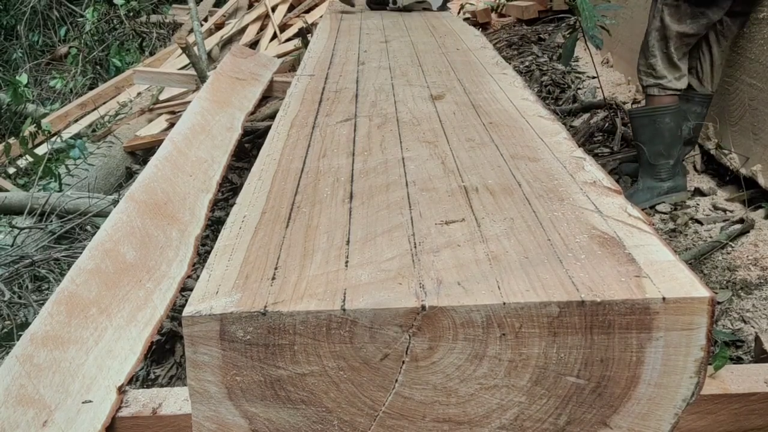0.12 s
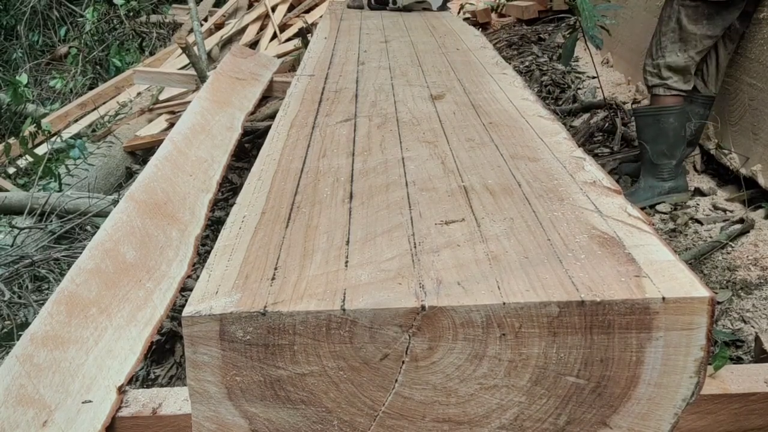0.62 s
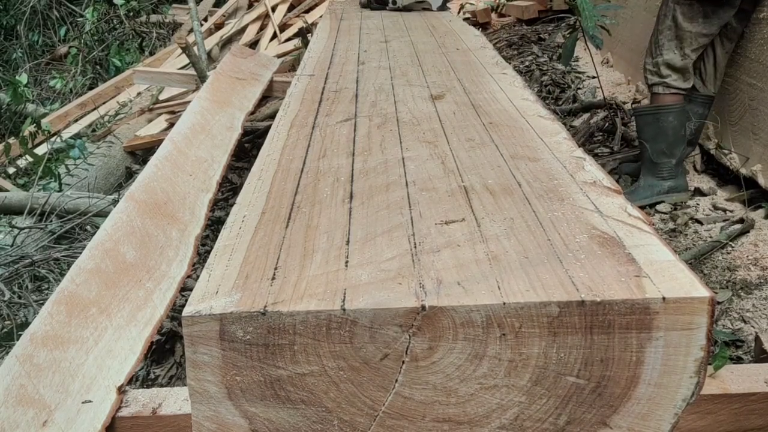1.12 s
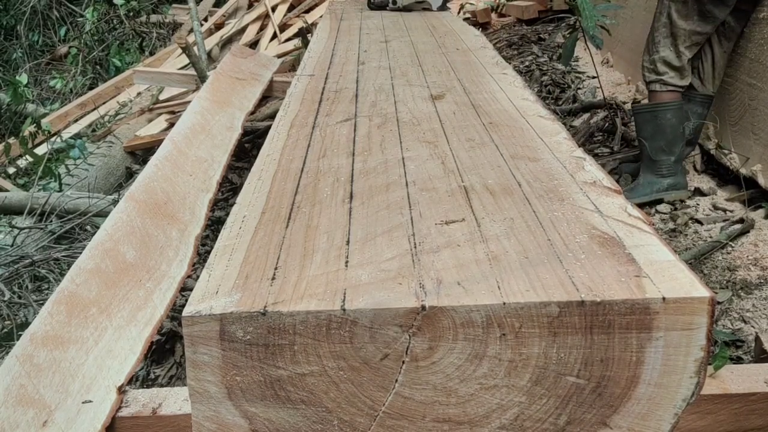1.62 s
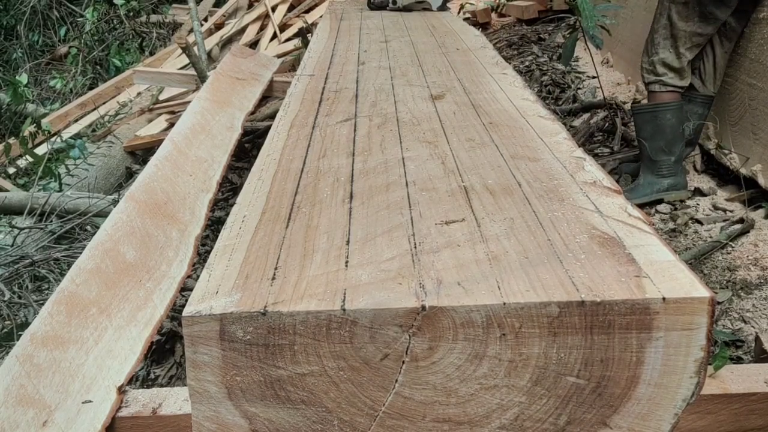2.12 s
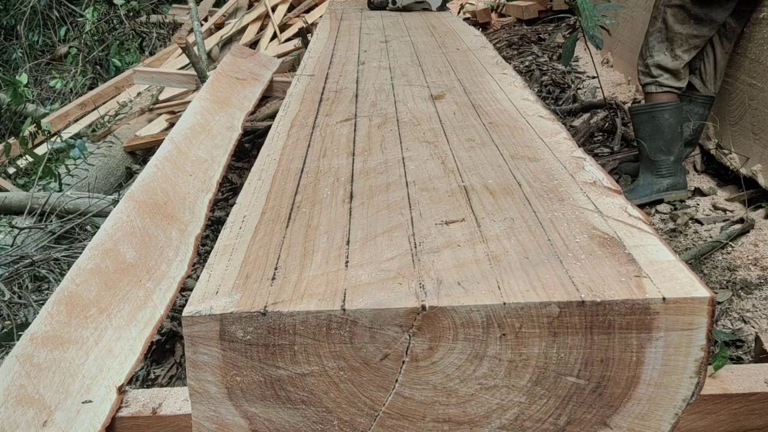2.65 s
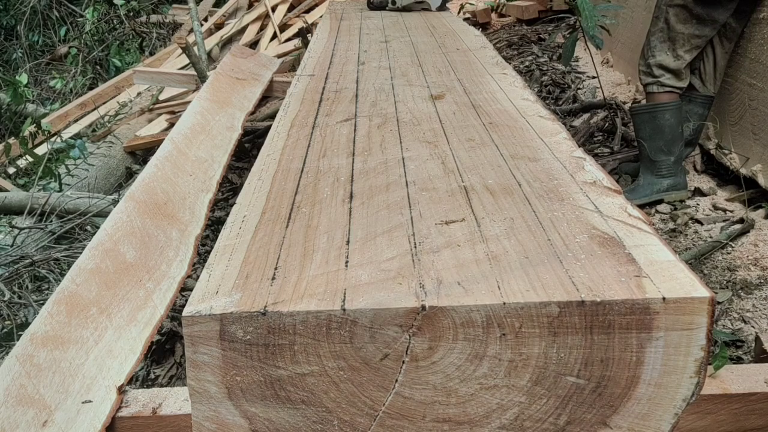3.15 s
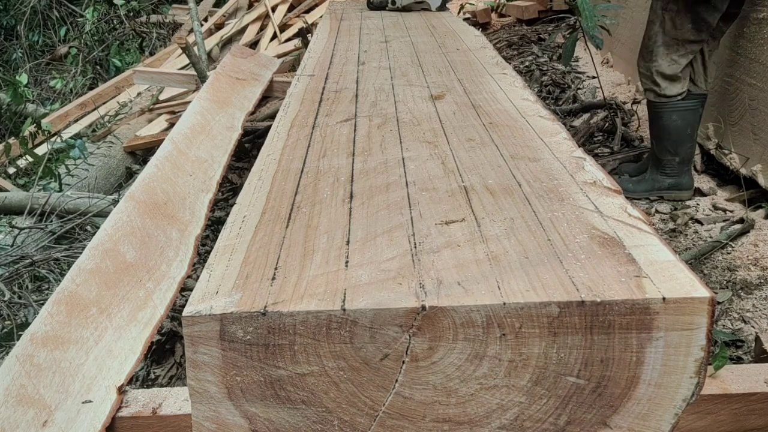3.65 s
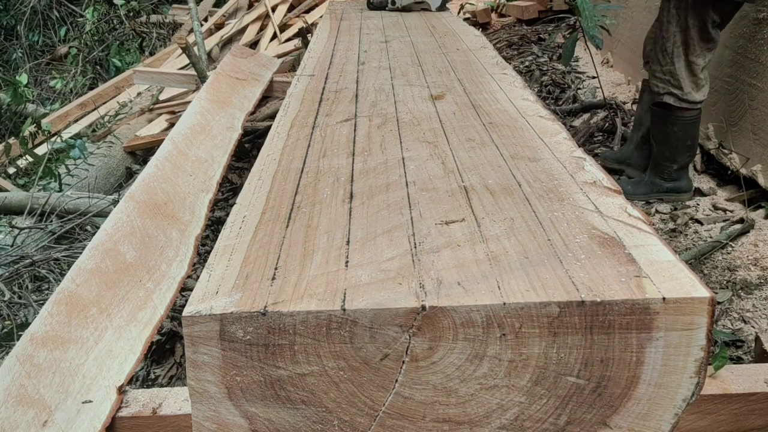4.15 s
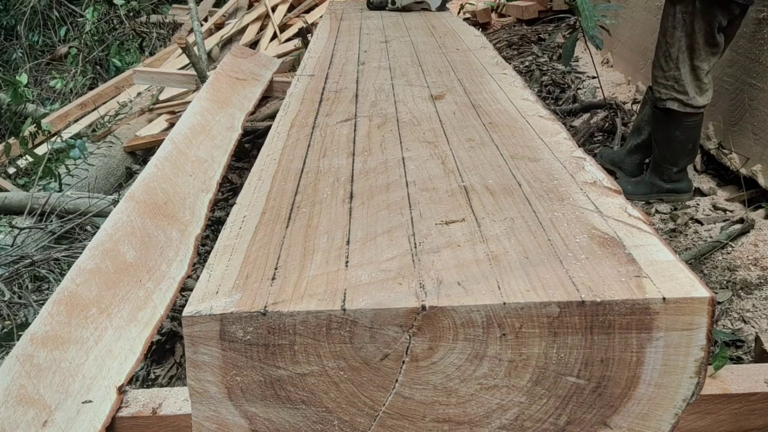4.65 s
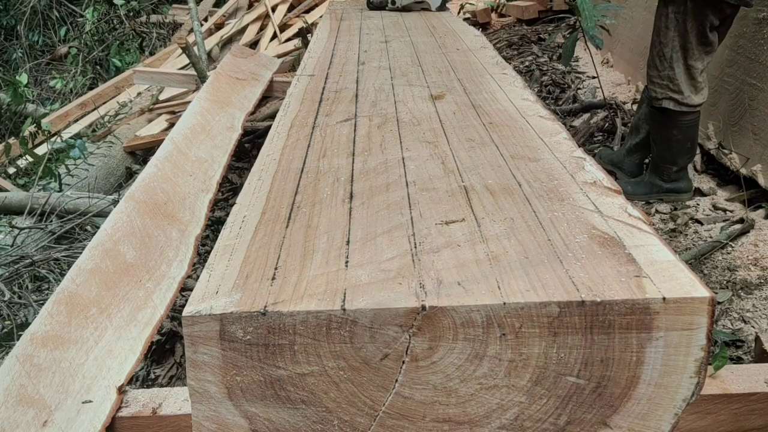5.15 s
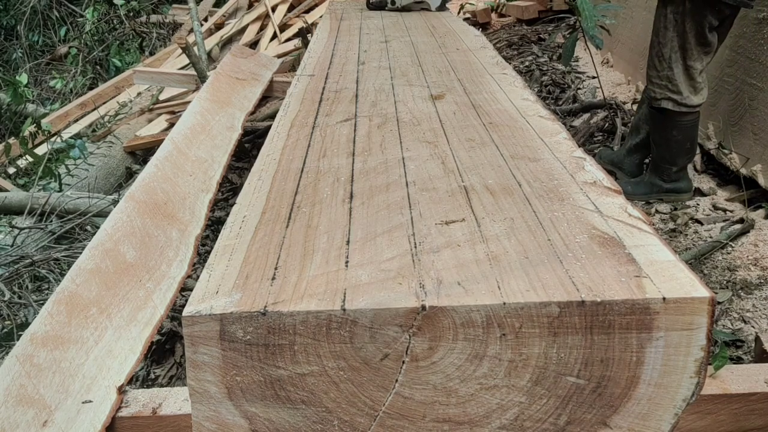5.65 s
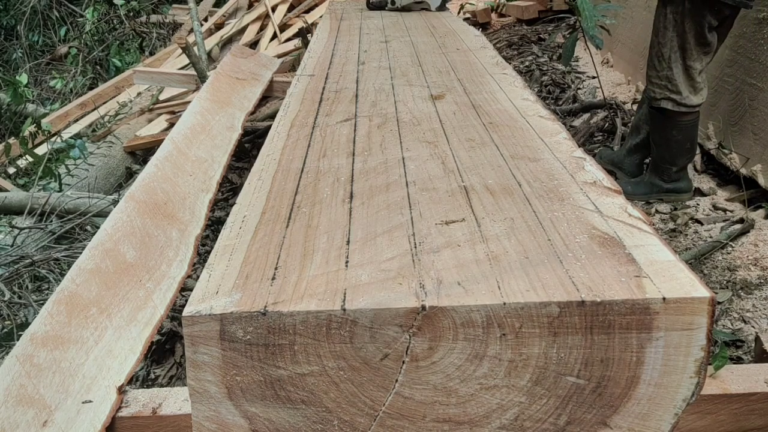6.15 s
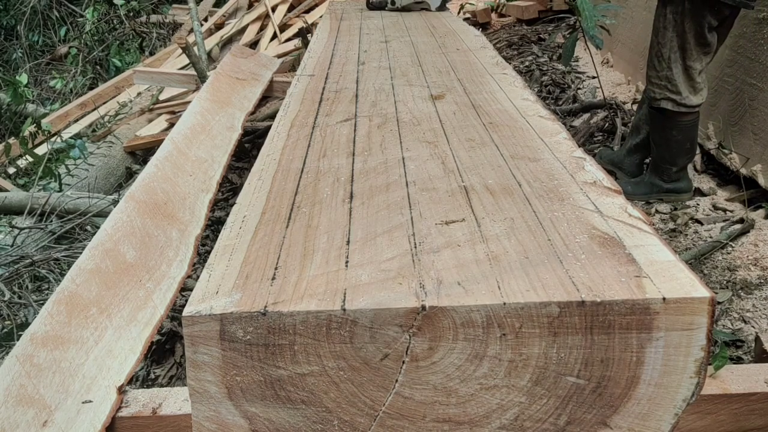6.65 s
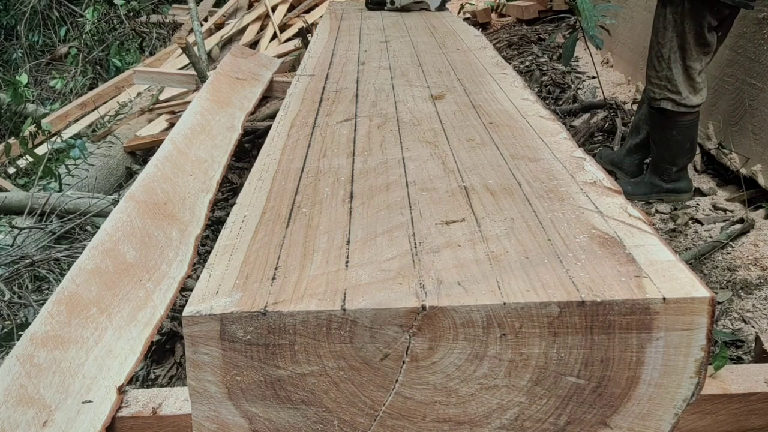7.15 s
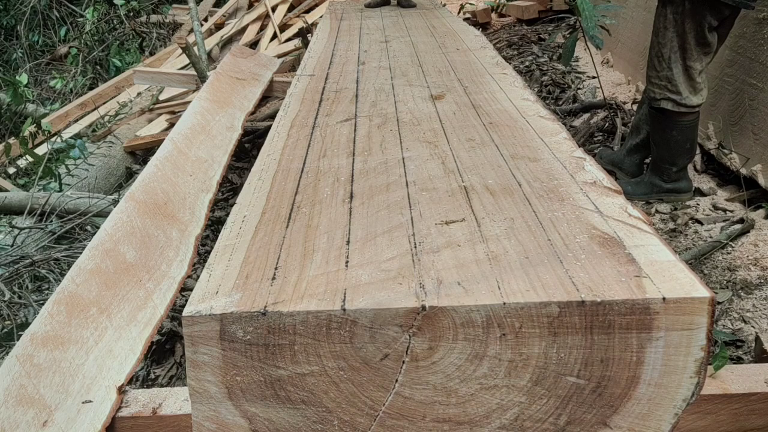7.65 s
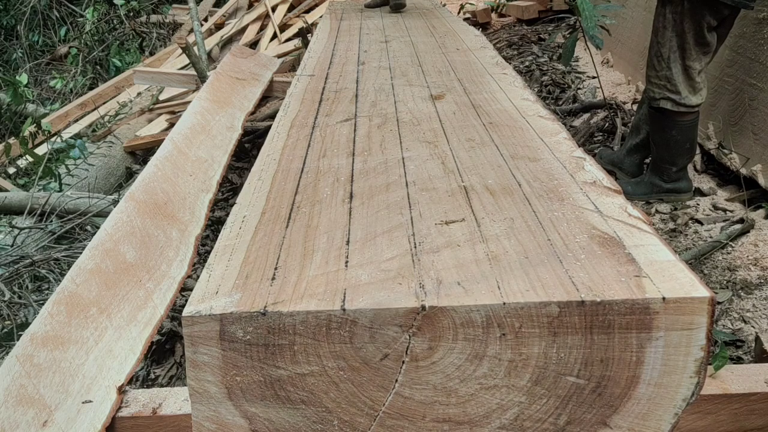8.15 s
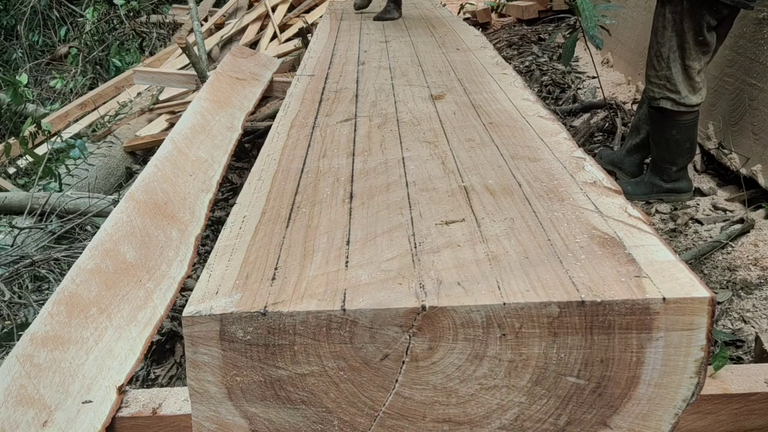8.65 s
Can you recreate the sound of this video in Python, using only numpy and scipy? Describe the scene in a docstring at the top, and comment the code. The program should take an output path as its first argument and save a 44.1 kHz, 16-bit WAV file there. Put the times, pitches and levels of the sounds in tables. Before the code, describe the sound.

A cold chainsaw is yanked over on its starter cord, sputters and dies twice, then catches and revs up in a quiet outdoor timber yard.

```python
"""Faint rustles and lumpy wind on the microphone, then a cold chainsaw is pulled over on its cord in a
woodland timber yard: one slow pull, two starts that sputter and die, a third that catches as the throttle
opens. Each crank turn thumps the muffler can and barks at the outlet, now and then it fires; the intake
gulps, chirps and roars. Noise contacts ring the casing as knocks and clatter, shaped noise makes the cord's
hiss, and timber stacks echo dully. Behind lie air, leaves and a faint hum of narrow noise bands."""
import sys
import numpy as np
from scipy import signal
from scipy.fft import rfft, irfft, next_fast_len
from scipy.io import wavfile
from scipy.ndimage import uniform_filter1d

SR = 44100
rng = np.random.default_rng(int(sys.argv[2]) if len(sys.argv) > 2 else 0)


def bounce(signal):
    """Save signal as a 16-bit WAV file at the path given by the first command-line argument."""
    frames = np.transpose(np.atleast_2d(signal))
    limited = np.clip(frames, -1, 1)
    pcm = np.round(limited * 32767).astype(np.int16)
    wavfile.write(sys.argv[1], SR, pcm)


def gain_from_db(level_db):
    """Convert decibel levels to linear amplitude factors (20 dB per decade)."""
    decades = np.asarray(level_db, float) / 20
    return 10 ** decades


N = 387198  # samples


def rms_one(x):
    """Scale to rms 1."""
    return x / np.sqrt(np.mean(x ** 2) + 1e-20)


def in_time(rows):
    """Columns of a curve, one value per sample."""
    s, *columns = np.transpose(rows)
    return [np.interp(np.arange(N) / SR, s, c) for c in columns]


def at_hz(points, hz):
    """Read a spectrum on a log-frequency axis."""
    point_hz, values = np.array(points)[:, 0], np.array(points)[:, 1]
    return np.interp(np.log(hz + 1), np.log(point_hz), values)


def band(x, low_hz, high_hz):
    """Band-pass."""
    return signal.sosfilt(signal.butter(2, [low_hz, high_hz], "band", fs=SR, output="sos"), x)


def drift(rate_hz):
    """Slow chance: random knots of spread 1, joined by straight lines."""
    knots = int(N / SR * rate_hz) + 2
    return np.interp(np.arange(N) / SR * rate_hz, np.arange(knots), rng.standard_normal(knots))


def grit(spread_db):
    """Dense contacts of uneven size, two unrelated streams sharing one level drift."""
    return rng.standard_normal((2, N)) * gain_from_db(spread_db * drift(400))


def lay(times, shapes):
    """Add one waveform at each time in seconds."""
    out = np.zeros(N + SR)
    for s, shape in zip(times, shapes):
        start = round(s * SR)
        out[start:start + len(shape)] += shape
    return out[:N]


def bursts(rows, swell_s):
    """Gain of events that rise 20 dB in swell_s up to their time, hold, and fade; the loudest one rules."""
    out, t = 0, np.arange(N) / SR
    for s, peak_db, hold_s, fade_s in rows:
        before, after = np.maximum(s - t, 0), np.maximum(t - s - hold_s, 0)
        out = np.maximum(out, gain_from_db(peak_db - 20 * (before / swell_s + after / fade_s)))
    return out


# How alike the two ears are. Each row: frequency in Hz, left-right likeness 0-1.
LIKENESS = [(60, 0.55), (240, 0.57), (950, 0.85), (3770, 0.41), (15000, 0.043)]
# Balance of the stereo pair. Each row: frequency in Hz, left minus right in dB.
LEAN = [(60, 12), (380, -3.5), (2380, 2), (15000, -1)]


def coloured(source, spectrum, low_hz, high_hz):
    """Two unrelated streams become a stereo pair with a spectrum; its mono sum has rms 1 in the band."""
    size = next_fast_len(N)
    hz = np.arange(size // 2 + 1) * SR / size
    alike = np.clip(at_hz(LIKENESS, hz), 0, 1)
    mid, side = rfft(source, size) * gain_from_db(at_hz(spectrum, hz))
    pair = np.sqrt(1 + alike) * mid + np.sqrt(1 - alike) * side * [[1], [-1]]
    lean = gain_from_db(at_hz(LEAN, hz) * [[.5], [-.5]])
    out = irfft(pair * lean, size)[:, :N]
    return out / np.std(band(out.mean(axis=0), low_hz, high_hz))


# Resonances of the saw's casing. Each row: frequency in Hz, relative level in dB, 60 dB decay in seconds.
CASING = [(849, 14.5, 0.038), (1240, 18.5, 0.014), (1633, 9.5, 0.023), (1980, 5.5, 0.03), (2244, 12, 0.016),
          (2820, -4, 0.033), (3627, 4.5, 0.025)]


def casing(contacts, share_db):
    """Contacts ring every casing mode, a two-pole resonator, each with its own share."""
    out = 0
    for k, (hz, level_db, t60) in enumerate(CASING):
        r, w = gain_from_db(-60 / (t60 * SR)), 2 * np.pi * hz / SR
        mode = signal.lfilter([0, np.sin(w)], [1, -2 * r * np.cos(w), r * r], contacts)
        out = out + gain_from_db(level_db + share_db[..., [k]]) * mode
    return out


# Carburettor. Each row: time in seconds, throttle opening 0-1.
THROTTLE = [(2.7, 0.19), (4.4, .05), (7.4, 0.13), (7.8, 0.54), (8.0, 0.75), (8.4, 0.9), (8.78, 0.79)]
# The crank fires or changes pace, then coasts to the next row. Each row: start in seconds, outlet bark level
# in dB, mean speed in turns per second (0 = a single turn), factor by which each turn outlasts the one before.
STROKES = [(1.946, -40, 5.5, 1.0), (2.124, -44.5, 0.0, 1.0), (2.54, -19.5, 18, 1.0),
           (2.594, -8, 30.8, 1.05), (2.822, -17, 25.0, 1.0), (2.862, -23.5, 31, 1.0),
           (2.894, -16, 22.5, 0.93), (3.073, -18.5, 18, 0.9), (3.183, -11.0, 22.7, 1.0),
           (3.227, -19.0, 24.5, 1.59), (3.309, -26, 19, 1.52), (3.415, -16.0, 20, 1.75),
           (3.514, -8.5, 29, 1.02), (3.653, -24.5, 19.0, 1.04), (3.8085, -13.5, 27.0, 0.95),
           (3.885, -25.0, 17, 0.9), (4.003, -8.5, 27.5, 1.05), (4.185, -28, 17.5, 1.04),
           (4.359, -37, 11, 0.99), (4.608, -42, 0.5, 1.0), (5.129, -18.5, 25, 1.0), (5.171, -7.0, 39, 0.95),
           (5.273, -23.5, 22, 1.02), (5.589, -30, 12.5, 1.0), (5.669, -30, 15, 1.49),
           (5.801, -30, 12.5, 1.2), (5.964, -44.5, 10, 1.47), (6.169, -44, 0.0, 1.0),
           (6.664, -18.0, 23, 1.0), (6.709, -7.5, 29.5, 1.1), (6.947, -22.5, 41.5, 1.0),
           (6.971, -28, 22.2, 0.9), (7.061, -13.0, 21.5, 1.0), (7.107, -28, 23.5, 1.43),
           (7.192, -8.5, 30.5, 1.0), (7.225, -14.5, 26.3, 1.08), (7.377, -22.5, 30.5, 1.0),
           (7.41, -14.0, 21, 0.97), (7.552, -12, 24, 1.21), (7.636, -25.5, 20.0, 1.5),
           (7.737, -18.0, 20.5, 1.12), (7.876, -8.5, 24.5, 0.99), (8.021, -7.0, 43.5, 1.0),
           (8.046, -6.5, 40.5, 1.03), (8.218, -13.5, 34.5, 1.04), (8.334, -14, 29.5, 1.0),
           (8.362, -10.5, 50, 1.0), (8.382, -5.5, 46.0, 1.02), (8.622, -11.0, 40.5, 1.02),
           (8.696, -12.5, 40.5, 1.05), (8.77, -20, 0.0, 1.0)]


def crank():
    """Every turn: time, bark, duration, throttle and intake gulp; unfired turns bark by their pace."""
    s, typed_db = [], []
    ends = [row[0] for row in STROKES[1:]] + [N / SR]
    for (start, db, speed, slowing), end in zip(STROKES, ends):
        lengths = slowing ** np.arange(max(round(speed * (end - start)), 1))
        s += list(start + (end - start) * (np.cumsum(lengths) - lengths) / lengths.sum())
        typed_db += [db] + [np.nan] * (len(lengths) - 1)
    s, typed_db = np.array(s)[:, None], np.array(typed_db)[:, None]
    coasting = np.isnan(typed_db)
    chance = rng.standard_normal((len(s), 2))

    # coasting turns come a little unevenly, less so with the throttle open
    jitter_s = .0012
    s = s + jitter_s * (1 - np.interp(s, *np.transpose(THROTTLE))) * coasting * chance[:, :1]
    turn = np.minimum(np.diff(s, axis=0, append=s[-1:] + .025), .12)

    # a coasting bark falls with the time the turn before took; some are feebler
    coast_db, coast_db_per_s, feebler_db = -8.5, 329, 4.0
    afterheat = 0.3505  # share of a firing's extra bark left in the next turn
    coast_db = coast_db - coast_db_per_s * np.roll(turn, 1)
    heat_db = afterheat * np.roll(np.nan_to_num(typed_db - coast_db), 1)
    coast_db = coast_db + heat_db - feebler_db * np.abs(chance[:, 1:])
    bark_db = np.where(coasting, coast_db, typed_db)

    # the gulp is louder with the throttle open and is lost on turns slower than 45 ms
    opening = np.interp(s, *np.transpose(THROTTLE))
    gulp_db = -27 + 11.0 * opening - 750.5 * np.maximum(turn - 0.045, 0)
    return s, bark_db, turn, opening, gulp_db


# The muffler can thumps about as hard whether a turn fires or not. Each row: bark in dB, thump in dB.
THUMP = [(-49.5, -42), (-40, -29), (-32.5, -23), (-20, -21.5), (-9, -18)]


def exhaust(turns):
    """Each port opening thumps the muffler can and barks in the outlet; hot gas barks higher and cracks."""
    s, bark_db, turn, opening, gulp_db = turns
    t, chance = np.arange(8000) / SR, rng.standard_normal((len(s), 4))[:, :, None]

    rise = 0.0022 + 0.088 * np.maximum(turn - .055, 0)  # a slow piston uncovers the port gently
    fade = (0.061 + 1.3 * np.clip(turn - .04, 0, .06)) * (1 - 0.56 * opening)
    thump_db = np.interp(bark_db, *np.transpose(THUMP)) + 4.6 * opening + 1.8 * chance[:, 2]
    thump_hz = (153 + 95 * opening) * (1 + (.05 + .07 * opening) * chance[:, 0])
    thump_time = t + 0.00098 * (1 - np.exp(-t / .005))  # pitch starts high and settles
    eddies = rms_one(band(rng.standard_normal((len(s), len(t))), 51, 330))  # the gas tumbles as it leaves
    thump = (1 - np.exp(-(t / rise) ** 2)) * gain_from_db(-60 * t / fade)
    thump = thump * (np.sin(2 * np.pi * thump_hz * thump_time + .5) + .33 * eddies)

    bark_hz = (np.clip(906.0 + 14 * bark_db, 610, 900) - 80 * opening) * (1 + 0.053 * chance[:, 1])
    bark_time = t - .0017 * opening * (1 - np.exp(-t / 0.0031))  # an open engine barks upward
    blowdown = np.exp(-(t / (.0058 - 0.0028 * opening)) ** 3) + 0.15 * gain_from_db(-60 * t / 0.04)
    blowdown = (1 - np.exp(-(t / 0.0025) ** 2)) * blowdown
    bark = gain_from_db(bark_db + 1.5 * opening) * blowdown * np.sin(2 * np.pi * bark_hz * bark_time + 0.4)

    crack_db = 2.22 * bark_db - 9.5 + 8.5 * opening + 0.83 * chance[:, 3]
    crack_hz = 2280 * (1 + .06 * opening * chance[:, 2])
    crack_time = t - .0006 * opening * (1 - np.exp(-t / .003))
    crack = gain_from_db(crack_db - 60 * t / (0.038 - 0.016 * opening)) * (1 - np.exp(-t / 0.00076))
    crack = crack * np.sin(2 * np.pi * crack_hz * crack_time)

    snap = gain_from_db(crack_db - 5.5 - 5.0 * opening - 60 * t / 0.03)
    spray = gain_from_db(crack_db - 27 - 60 * t / .45)  # hot gas
    spit = (snap + spray) * band(rng.standard_normal((len(s), len(t))), 1300, 8500)
    return lay(s[:, 0], gain_from_db(thump_db) * thump + bark + crack + spit)


def intake(turns):
    """The crankcase gulps and rings the filter box; an open throat chirps. Returns tones and air flow."""
    s, bark_db, turn, opening, gulp_db = turns
    t, chance = np.arange(3000) / SR, rng.standard_normal((len(s), 4))[:, :, None]

    gulp = (1 - np.exp(-(t / 0.0022) ** 2)) * (np.exp(-(t / 0.0045) ** 2) + 0.25 * gain_from_db(-60 * t / 0.0922))
    gulp = gain_from_db(gulp_db + 1.5 * chance[:, 0]) * gulp
    ring_hz = 490 + 5000 * np.maximum(.03 - turn, 0)
    ring_hz = ring_hz * (1 + (.03 + .04 * opening) * chance[:, 1])
    ring = gulp * np.sin(2 * np.pi * ring_hz * t)
    gulps = lay((s + .41 * turn)[:, 0], ring)  # part of a turn after the exhaust
    blowback = lay(s[:, 0], .95 * opening * ring)  # exhaust kicks the open box too

    # the chirp sweeps up as the ports uncover
    sweep = 1650 * (1 + .05 * chance[:, 2]) * (t + 20 * t ** 2)
    chirp = opening ** 4 * gain_from_db(-21 + 0.35 * bark_db + 1.7 * chance[:, 3])
    chirp = chirp * np.exp(-((t - .005) / 0.0025) ** 2) * np.sin(2 * np.pi * sweep)

    # flow grows with speed and peaks late in the turn
    pulse = 1.12 + np.exp(-((t / turn - .85) / 0.19) ** 2)
    flow = opening ** 2 * (0.021 / turn) ** 2.9 * pulse * (t < turn)
    return gulps + blowback + lay(s[:, 0] - .004, chirp), lay(s[:, 0], flow)


# Air through the open intake. Each row: frequency in Hz, relative level in dB per Hz.
OPEN_ROAR = [(800, -3.5), (1300, -34), (1540, -12.5), (1680, 8.5), (1830, -3), (2200, 0), (2700, -6.5),
             (3400, -14.5), (4100, -5), (5300, -14.5), (9000, -23), (15500, -36)]


def intake_roar(flow):
    """Air roars through the open intake with the flow, and hisses past a half-open throttle plate."""
    roar = gain_from_db(-39.0) * flow * coloured(grit(3.1), OPEN_ROAR, 1000, 6000)
    from_half_open = (in_time(THROTTLE)[0] - .58) / .24  # loudest at opening .58
    squeeze_db = -45 - 20 * from_half_open ** 2 + 3.4 * drift(50)
    return roar + gain_from_db(squeeze_db) * rms_one(band(grit(2.8), 2100, 3105))


# Knocks and rattles of the casing. Each row: start in seconds, level in dB, pitch of the struck part in Hz,
# brightness in dB.
KNOCKS = [(1.0485, -48, 1980, 1.5), (1.31, -53, 1203, -32), (1.356, -50.5, 1240, -18.5),
          (1.3809, -48, 2473, -21), (1.444, -46.5, 2438, 0), (1.6919, -45.5, 1284, -1),
          (1.726, -28, 1240, -46), (1.8866, -34, 1255, -27), (2.0713, -35, 1308, -22.5),
          (2.2926, -41.5, 1412, -18), (3.351, -21, 1550, -28.5), (4.156, -26.5, 1261, -3),
          (4.9112, -45, 1240, -17), (4.979, -56.5, 2040, 8), (5.036, -21.5, 1330, -6),
          (5.438, -15, 1480, -11.5), (5.704, -29, 1122, -8), (6.469, -37.5, 1004, -45),
          (6.5168, -52, 2150, 3), (7.078, -19.5, 1160, -37), (7.876, -21, 2279, -51),
          (5.757, -34, 2090, -20), (2.16, -43, 1500, -20), (2.366, -52, 2200, -5), (7.765, -44, 3600, 12),
          (6.564, -50, 2200, -8), (1.428, -55, 2300, -3)]


def knocks():
    """A short clump of contacts rings the modes nearest the struck part, over a dry knock and a snap."""
    s, peak_db, struck_hz, bright_db = np.transpose(KNOCKS)[:, :, None]
    t = np.arange(4000) / SR
    length = 0.0018 + 0.014 * gain_from_db(peak_db / 2)  # hard knocks rattle on
    clump = rng.standard_normal((len(s), len(t)))
    clump = clump * (1 - np.exp(-(t / 0.0014) ** 2)) * np.exp(-t / length)
    octaves_apart = np.abs(np.log2(np.array(CASING)[:, 0] / struck_hz))
    rung = casing(clump, rng.normal(0, 1.1, octaves_apart.shape) - 30 * octaves_apart)
    dry_knock = band(band(clump, 450, 2700), 450, 2700)
    snap = band(clump, 4500, 9300)
    rung, dry_knock, snap = [p / np.abs(p).max(axis=1, keepdims=True) for p in (rung, dry_knock, snap)]
    return lay(s[:, 0], gain_from_db(peak_db) * (0.55 * rung + 0.5 * dry_knock + gain_from_db(bright_db - 8.0) * snap))


# Rattle of the loose metal. Each row: frequency in Hz, relative level in dB per Hz.
CLATTER = [(150, -23), (300, -6), (370, -17.5), (470, -3), (640, -10), (980, -11), (1660, -6.5),
           (2100, -13.5), (2900, -20.5), (4000, -24), (6850, -36.5), (8090, -32), (11100, -38),
           (15500, -43.5)]
# A pull or a stall jolts the whole saw. Each row: time of full level in seconds, clatter level in dB, hold
# in seconds, seconds to fade 20 dB.
JOLTS = [(2.441, -55, 0.1147, 0.7538), (4.72, -57.5, 0.0078, 0.1), (5.07, -52.5, .06, 0.5),
         (6.3, -66.5, 0.0073, 0.1024), (6.62, -54.5, .05, 0.7224)]


def clatter(turns):
    """Clutch, chain and pawls rattle most mid-turn; on slow turns they jump ahead of the chug, then still."""
    s, bark_db, turn, opening, gulp_db = turns
    part = np.arange(6000) / SR / turn  # share of the turn gone by
    slow = np.clip((turn - .048) / .05, 0, 1)
    jump_db = 4.6 * np.exp(-part / .12) + 3.7 - 16 * part ** 2.5
    swell_db = (1 - slow) * 2.5 * np.exp(-((part - .55) / 0.05) ** 2) + slow * jump_db
    swell_db = uniform_filter1d(lay(s[:, 0] - .004, swell_db * (part < 1)), size=260)

    ticks = grit(3.66)
    ticks = rms_one(ticks) + .22 * rms_one(casing(ticks, np.zeros(len(CASING))))
    rattle = coloured(ticks, CLATTER, 1007.0, 1287.0)

    # slow turns and an open throttle shake less
    running = lay(s[:, 0], gain_from_db(-39 - 211 * turn - 12.5 * opening) * (part < 1))
    running = uniform_filter1d(running, size=round(0.15147 * SR))
    gain = np.maximum(running, bursts(JOLTS, 0.0074))

    # on slow turns the casing clacks, its modes mixed by chance
    clicks = rng.standard_normal(part.shape) * part / .03 * np.exp(-part / .03)
    octaves_apart = np.abs(np.log2(np.array(CASING)[:, 0] / 1400))
    clack = casing(clicks[:, :3000], rng.normal(0, 6.4, (len(s), len(CASING))) - 25 * octaves_apart)
    clack = slow * gain_from_db(-24.5 - 96 * turn) * clack / np.abs(clack).max(axis=1, keepdims=True)
    return gain * gain_from_db(swell_db + drift(40)) * rattle + lay(s[:, 0] - .004, clack)


# The starter cord runs out, slackens and rewinds. Each row: time of full level in seconds, level in dB, hold
# in seconds, seconds to fade 20 dB.
CORD_STROKES = [(1.76, -53, 0.18, 0.05), (2.012, -44.5, 0.018, 0.12), (2.3, -63.5, 0.047, 0.3),
                (2.47, -47.5, 0.00044, 0.04), (2.503, -29, 0.0016, 0.05), (2.52, -44.5, 0.000056, 0.24),
                (4.68, -51.5, 0.01635, 0.12), (5.05, -51, 0, 0.1), (5.1, -39.5, 0, 0.0529),
                (5.15, -53.5, 0.042, 0.32), (6.25, -51, 0, 0.12), (6.6, -51, 0.021, 0.1336),
                (6.63, -41.5, 0, 0.15), (6.72, -52, 0.024, 0.1258)]
# Hiss of a slow cord. Each row: frequency in Hz, relative level in dB per Hz.
CORD_SLOW = [(180, -35), (486, -7), (1360, 4.5), (1930, -2.5), (3580, 2.5), (6200, -4), (7820, 2),
             (11900, -5.5), (15000, -4)]
# A fast-running cord hisses brighter. Each row: frequency in Hz, relative level in dB per Hz.
CORD_FAST = [(300, -25), (1360, -10), (3000, -12.5), (5500, -7.5), (7600, 2), (10000, -2.5), (15000, -9)]


def cord(turns):
    """Hiss of cord and starter drum, brighter the faster it runs."""
    s, bark_db, turn, opening, gulp_db = turns
    whirr = lay(s[:, 0], gain_from_db(-68.5) * (np.arange(6000) / SR < turn))  # the drum, while the engine turns
    gain = np.maximum(bursts(CORD_STROKES, 0.022), whirr)
    fast = gain ** 2 / (gain ** 2 + gain_from_db(2 * -38.5))  # the bright hiss takes half at -38.5 dB
    slow_hiss = np.sqrt(1 - fast) * coloured(grit(1.6), CORD_SLOW, 3000, 12000)
    fast_hiss = np.sqrt(fast) * coloured(grit(2.5), CORD_FAST, 3000, 11000)
    return gain * gain_from_db(0.67 * drift(60)) * (slow_hiss + fast_hiss)


# Timber stacks. Each row: delay at the left in seconds, delay at the right in seconds, level in dB.
ECHOES = [(.009, .012, -15.5), (.021, .017, -23.5), (.038, .045, -17)]


def timber(x):
    """The sound with a few dull echoes, other delays at each ear."""
    dull = band(x, 210, 5000)
    echoes = [gain_from_db(level_db) * np.array([lay([left], [dull]), lay([right], [dull])])
              for left, right, level_db in ECHOES]
    return x + sum(echoes)


# Air and leaves. Each row: frequency in Hz, relative level in dB per Hz.
YARD = [(24, -55), (40, -25), (140, -9.5), (300, -8), (585, -9), (900, -14.5), (1500, -19), (2050, -11),
        (2450, -19), (2770, -12), (3300, -23), (4030, -10), (6170, -13), (6700, -20), (10000, -12),
        (16000, -15.5)]
# Wind on the microphone. Each row: time in seconds, mean level in dB.
BREEZE = [(0, -77), (.1, -72), (.22, -86.5), (.34, -69), (.5, -83.5), (.62, -85)]
# Faint rustles underfoot. Each row: time of full level in seconds, level in dB, hold in seconds, seconds to
# fade 20 dB.
RUSTLES = [(.05, -74.5, 0.031, 0.04), (.41, -75, 0.045, .06), (.735, -75, .005, 0.4)]
# Colour of a rustle. Each row: frequency in Hz, relative level in dB per Hz.
RUSTLE = [(150, -4), (600, 0), (1500, -3), (2500, -6), (5000, -11), (12000, -23)]
# Distant drone. Each row: frequency in Hz, width in Hz, mean level in dB.
HUM = [(601.11, 90, -89.5), (2040, 120, -87.5), (2730, 90, -91.5)]


def yard():
    """Air and leaves, gusting a little, lumpy wind, rustles and a drone of narrow bands that come and go."""
    air = gain_from_db(-78.5 + 0.8 * drift(4)) * coloured(rng.standard_normal((2, N)), YARD, 40, 16000)
    wind = gain_from_db(in_time(BREEZE)[0] + 3.0 * drift(27)) * rms_one(band(rng.standard_normal(N), 70, 240))
    rustles = bursts(RUSTLES, .04) * coloured(grit(4.0), RUSTLE, 300, 5000)
    out = air + wind + rustles
    for hz, width_hz, level_db in HUM:
        comes_db = level_db + 7.0 * drift(5) + 3.0 * drift(25)
        tone = band(rng.standard_normal(N), hz - width_hz / 2, hz + width_hz / 2)
        out = out + gain_from_db(comes_db) * rms_one(tone)
    return out


def scene():
    """The saw with its echoes, its noises and the yard."""
    turns = crank()
    tones, flow = intake(turns)
    saw = timber(exhaust(turns) + tones + knocks())
    return saw + intake_roar(flow) + clatter(turns) + cord(turns) + yard()


def top_cut(x):
    """Nothing passes above the cut-off."""
    return signal.sosfilt(signal.butter(12, 16500, fs=SR, output="sos"), x)


def record(dry):
    """The deepest bass is thinned, the very top is filtered off and peaks are rounded."""
    thin = signal.sosfilt(signal.butter(1, 85, "high", fs=SR, output="sos"), dry)
    thin = signal.sosfilt(signal.cheby2(10, 50, 16300, fs=SR, output="sos"), thin)
    rounded = 1.49 * np.tanh(thin / 0.93)
    return top_cut(rounded)


dry = scene()
out = record(dry)
bounce(out)
```